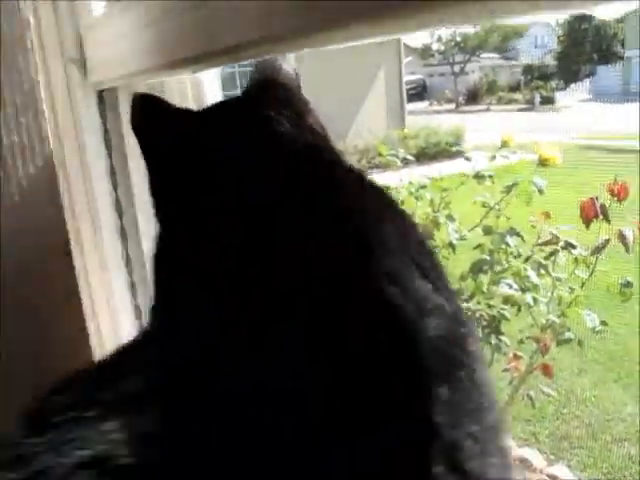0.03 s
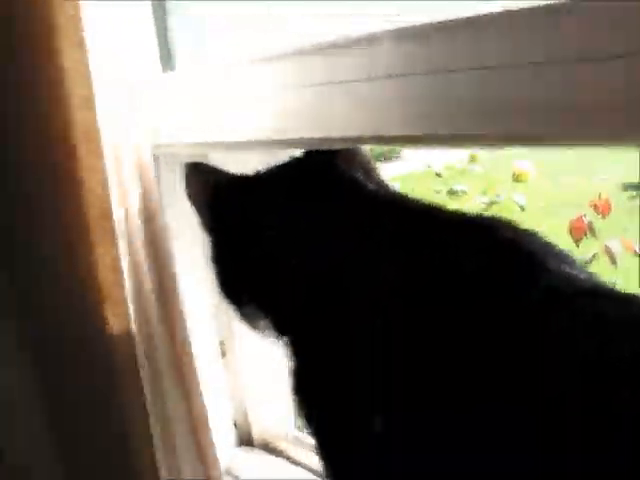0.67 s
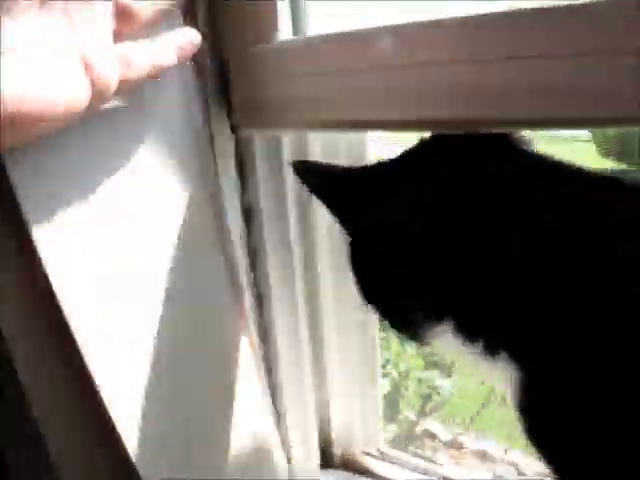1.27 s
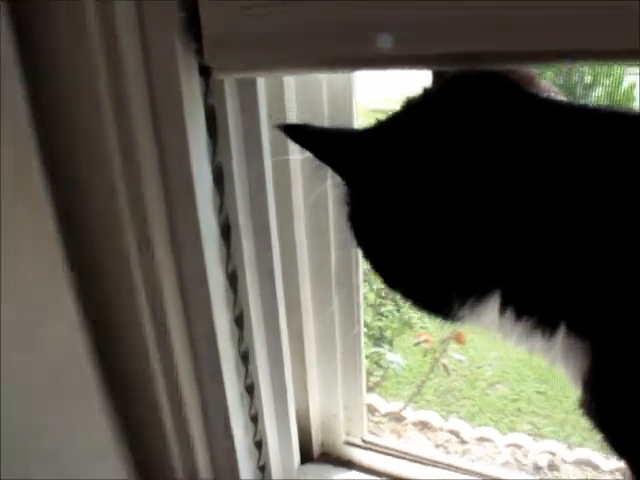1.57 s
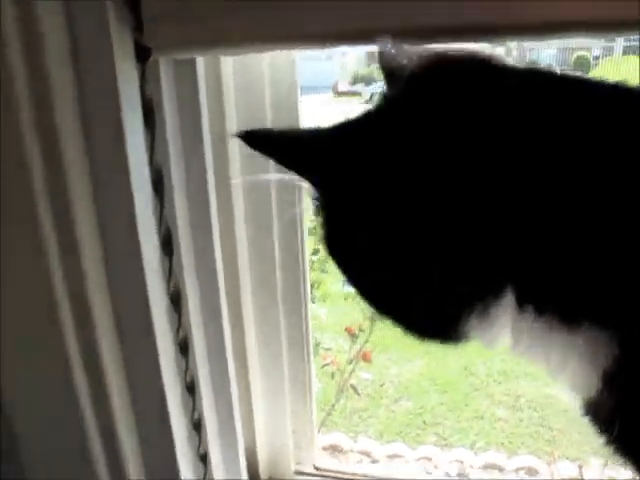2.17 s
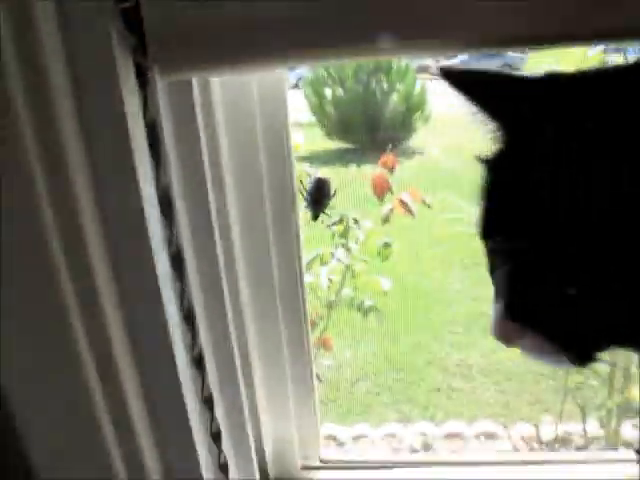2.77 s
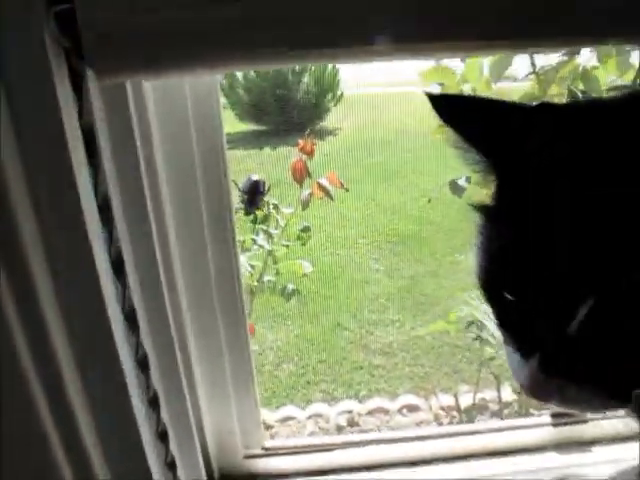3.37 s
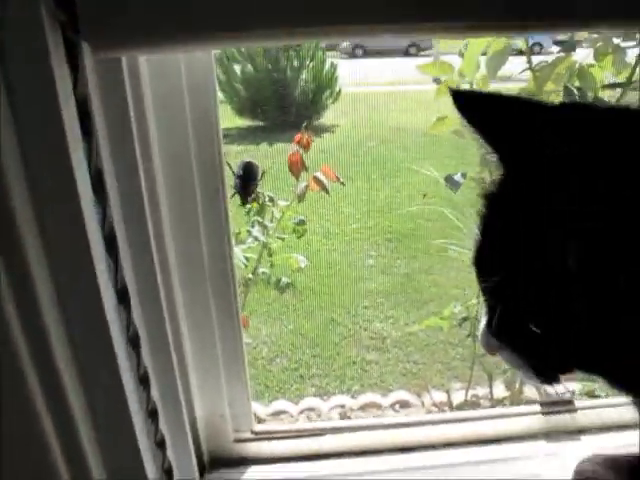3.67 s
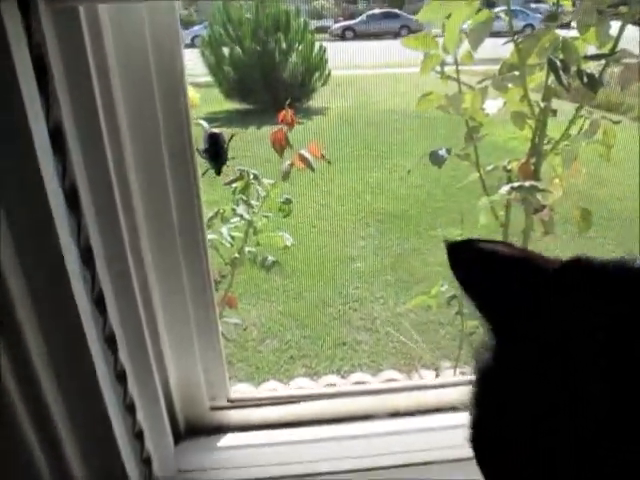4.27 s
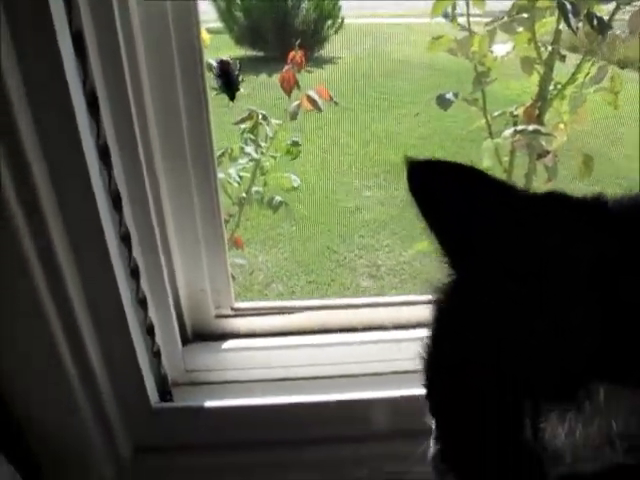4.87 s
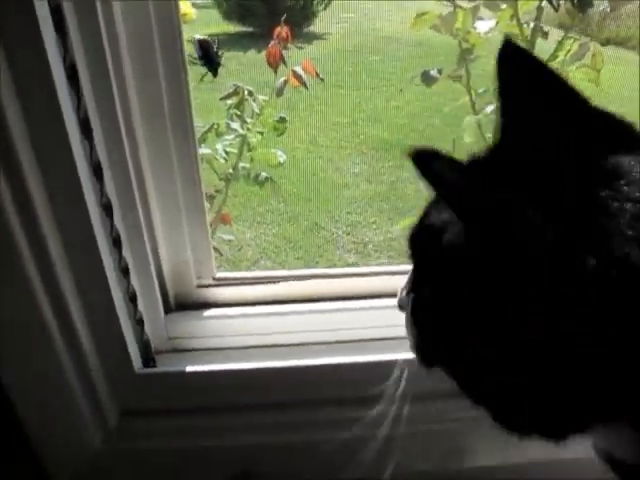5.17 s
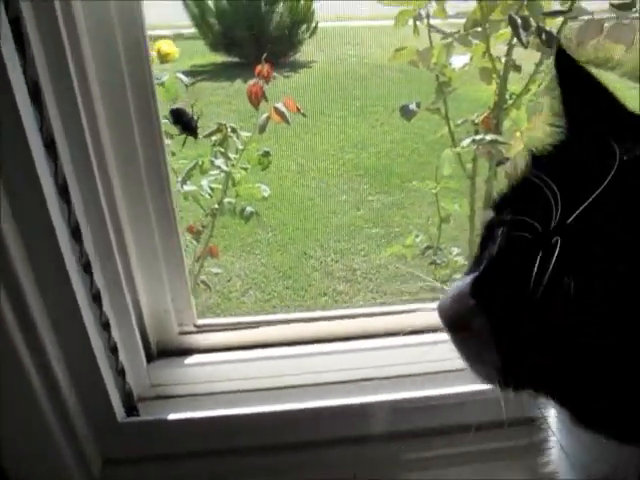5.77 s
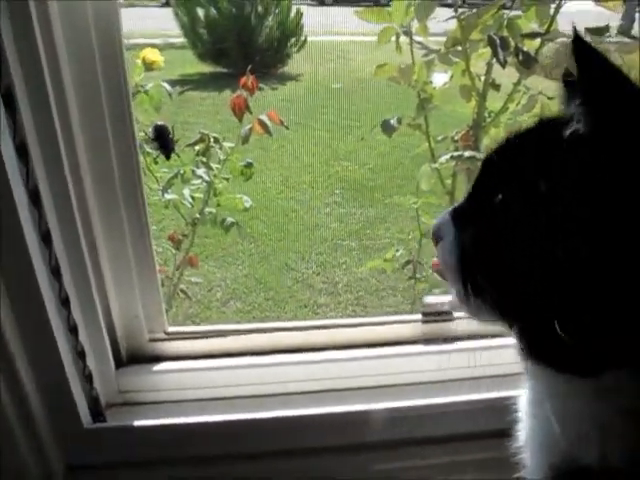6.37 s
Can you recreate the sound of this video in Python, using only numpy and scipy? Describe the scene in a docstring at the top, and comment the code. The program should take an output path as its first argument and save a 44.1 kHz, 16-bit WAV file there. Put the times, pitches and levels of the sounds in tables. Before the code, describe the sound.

Sparse sharp plastic clicks, soft scuffs and wooden knocks come from a window blind pushed aside near a cat indoors.

```python
"""A cat at the window blind

A cat noses about on an indoor window sill while a hand holding a small camera pushes the blind aside.
The blind rustles, scuffs and knocks on the wooden frame; its rail and a small metal part rattle.
Plastic clicks right at the microphone, and there is one soft thump, like a paw set down.
Under it all lie faint hiss, mains hum, a few thin tones and the camera's whine."""
import sys
import numpy as np
from scipy import signal
from scipy.fft import rfft, irfft, next_fast_len
from scipy.io import wavfile
from scipy.ndimage import map_coordinates

SR = 44100
rng = np.random.default_rng(int(sys.argv[2]) if len(sys.argv) > 2 else 0)


def dump(signal):
    """Clip the signal to [-1, 1] and save it as 16-bit WAV at the path in sys.argv[1]."""
    limited = np.clip(np.atleast_2d(signal).T, -1, 1)
    pcm = np.round(limited * 32767).astype(np.int16)
    wavfile.write(sys.argv[1], SR, pcm)


N = 283563


def amp(db):
    """Turn decibels into gain. amp(-60 * t / t60) fades by 60 dB in t60 seconds."""
    return 10 ** (np.asarray(db) / 20)


def unit(x):
    """Scale a sound to an average (rms) level of 1."""
    return x / np.sqrt(np.mean(x ** 2) + 1e-20)


def burst(x, seconds):
    """Give a hit as much energy as that many seconds of sound at level 1."""
    return x * np.sqrt(seconds * SR / (np.sum(x ** 2) + 1e-20))


def along(points, hz):
    """Read between (frequency, value) points, with octaves evenly spaced."""
    f, values = np.transpose(points)
    return np.interp(np.log(hz + 1), np.log(f + 1), values)


def wobble(rate):
    """A smooth curve through `rate` random values a second."""
    points = rng.standard_normal(int(N * rate / SR) + 4)
    return map_coordinates(points, [np.arange(N) * rate / SR])


def filtered(x, gain_at):
    """Turn each frequency up or down by gain_at(hz)."""
    size = next_fast_len(len(x) + 8192)
    return irfft(rfft(x, size) * gain_at(np.fft.rfftfreq(size, 1 / SR)), size)[:len(x)]


def noise(colour, size):
    """Noise at level 1; its colour says how strong each frequency is."""
    return unit(filtered(rng.standard_normal(size), lambda hz: amp(along(colour, hz))))


def contact(x, low_hz, high_hz):
    """A small contact makes no low notes, a soft one no high notes."""
    for hz, kind in ((low_hz, "high"), (high_hz, "low")):
        x = signal.sosfilt(signal.butter(2, min(hz, SR / 2 - 1), kind, fs=SR, output="sos"), x)
    return x


def add(track, s, x):
    """Mix x into the track at s seconds."""
    part = track[round(s * SR):][:len(x)]
    part += x[:len(part)]


def ringing(notes, share, t, scatter_db):
    """A struck part rings; whatever presses on it leaves only a share of its ringing time."""
    offsets_db = scatter_db * rng.standard_normal(len(notes))
    return sum(amp(db + offset - 60 * t / (t60 * share)) * np.sin(2 * np.pi * hz * t)
               for (hz, db, t60), offset in zip(notes, offsets_db))


def swells(pushes):
    """Each push grows and dies away; where pushes overlap, their powers add."""
    t = np.arange(N) / SR
    return np.sqrt(sum((amp(db) * np.exp(-np.maximum((s - t) / swell, (t - s) / ease))) ** 2
                       for s, db, swell, ease in pushes))


def background(hiss_db=-60.0, whine_hz=5880, settle_s=0.031, waver_db=0.3):
    """Steady hiss, mains hum and the camera's whine, which switches between levels."""
    # colour of the room and microphone hiss: f/Hz, level/dB
    hiss_colour = [(15, -3.5), (55, -1.5), (130, -0.5), (300, -6), (900, -8.5), (2500, -14), (6000, -18),
                   (8500, -20), (10300, -19), (11500, -29.5), (13000, -27), (15500, -28.5)]
    # notes of the hum: f/Hz, level/dB
    hum_notes = [(59.5, -75), (120, -90.5), (300, -77), (1077, -80.5)]
    # levels the whine holds: from t/s, level/dB
    steps = [(0, -57), (.63, -68), (1.79, -57), (3.91, -62), (5.06, -57.5), (5.15, -62.5)]
    t = np.arange(N) / SR
    hum = sum(amp(db + wobble(2.07)) * np.sin(2 * np.pi * (hz * t + rng.random()))
              for hz, db in hum_notes)
    whine_db = steps[0][1]
    for (_, old), (s, new) in zip(steps, steps[1:]):
        whine_db += (new - old) * (1 + np.tanh((t - s) / settle_s)) / 2
    whine = amp(whine_db + waver_db * wobble(12)) * np.sin(2 * np.pi * whine_hz * t)
    return amp(hiss_db) * noise(hiss_colour, N) + np.sqrt(2) * (hum + whine)


def faint_tones(waver_db=1.6, blur_hz=7, blur_rate=60):
    """A few thin, blurred tones come and go, barely above the hiss."""
    # gliding tones: start t/s, end t/s, first f/Hz, last f/Hz, level/dB
    tones = [(1.34, 1.37, 4350, 4280, -64), (2.1, 2.227, 848, 841, -64), (3.08, 3.204, 837, 828, -64.5),
             (3.144, 3.422, 719, 680, -66), (4.12, 4.456, 1663, 1680, -61.5)]
    out = np.zeros(N)
    for start, end, first_hz, last_hz, db in tones:
        size = round((end - start) * SR)
        hz = np.linspace(first_hz, last_hz, size) + blur_hz * wobble(blur_rate)[:size]
        tone = np.sqrt(2) * np.sin(2 * np.pi * np.cumsum(hz) / SR)
        add(out, start, amp(db) * signal.windows.tukey(size, .3) * tone)
    return out * amp(waver_db * wobble(40))


def blind_rustle(grain_db=3, unsteady_db=1.0, unsteady_rate=22):
    """The blind rubs in fine grains under an unsteady push, and rasps where it drags on the frame."""
    # pushes that slide the blind: fastest at t/s, level/dB, swell/s, ease off/s
    pushes = [(.01, -60.5, .03, .11), (.325, -51, 0.038, .055), (.49, -60, 0.13, 0.33),
              (1.105, -52.5, 0.078, 0.26), (1.64, -60, 0.23, 0.33), (2.07, -60, 0.1, 0.3),
              (2.54, -55.5, 0.26, 0.28), (3.07, -56, 0.19, 0.33), (3.59, -58, 0.04, 0.062)]
    # drags on the frame: hardest at t/s, level/dB, swell/s, ease off/s
    drags = [(.01, -67, .03, 0.15), (.278, -56, 0.0072, 0.058), (.355, -59, 0.032, 0.03),
             (.46, -62, 0.086, .07), (2.265, -55, .012, .025), (3.365, -53.5, .003, 0.039)]
    # colour of the fine rubbing: f/Hz, level/dB
    rub_colour = [(290, -43.5), (500, -5), (827, -3.5), (888, -4), (1180, -5), (3630, -8.5), (5510, -8.5),
                  (6000, -4), (6270, -10.5), (10400, -7), (15500, -34.5)]
    # colour of the duller rasp: f/Hz, level/dB
    rasp_colour = [(800, -30.5), (2000, -11.5), (2700, -7.5), (3600, -14), (5500, -25), (12000, -50)]
    rub = swells(pushes) * unit(noise(rub_colour, N) * amp(grain_db * wobble(700)))
    rasp = swells(drags) * unit(noise(rasp_colour, N) * amp(grain_db * wobble(300)))
    return (rub + rasp) * amp(unsteady_db * wobble(unsteady_rate))


def blind_scuffs():
    """The blind's edge catches and slides: a sudden bright scrape that fades as it lets go."""
    # slides: t/s, level/dB, length/s, fade t60/s, lowest f/Hz
    slides = [(.495, -63, 0.0074, .04, 8000), (0.512, -53.5, 0.0045, 0.063, 7000),
              (0.6218, -39, 0.018, 0.027, 2560), (0.705, -50.5, 0.0015, 0.19, 1500),
              (1.467, -58, 0.0046, 0.39, 1500), (1.692, -48, 0.004, 0.054, 5000),
              (1.819, -44.5, 0.0012, 0.013, 5000), (1.884, -46.5, 0.0021, 0.06, 10050),
              (1.997, -57.5, .012, 0.048, 8000), (2.1444, -52, 0.0017, .02, 3000),
              (2.2336, -54, .004, .03, 6000), (2.389, -54.5, 0.023, 0.029, 5000),
              (2.511, -53, 0.014, 0.055, 2480), (2.6083, -51.5, 0.01, 0.1, 4000),
              (2.751, -55.5, .004, 0.068, 4000), (3.094, -52, 0.016, 0.09, 2520),
              (3.561, -57, 0.0047, 0.028, 4000), (3.587, -55, 0.016, 0.066, 2990),
              (3.807, -59.5, .004, .1, 4070), (4.187, -52.5, 0.0052, 0.25, 4450),
              (4.381, -60, .001, 0.022, 9060)]
    # colour of the scrape: f/Hz, level/dB
    colour = [(470, -49.5), (800, -19), (1910, -6.5), (2500, -18.5), (2630, -4.5), (3370, -5.5),
              (5820, -10), (9090, -5.5), (10400, -5), (11700, -26.5), (15500, -28)]
    out, t = np.zeros(N), np.arange(SR // 4) / SR
    for s, db, length, t60, low_hz in slides:
        grit = filtered(noise(colour, len(t)), lambda hz: hz ** 2 / np.hypot(hz ** 2, low_hz ** 2))
        add(out, s, amp(db - 60 * np.maximum(t - length, 0) / t60) * unit(grit))
    return out


def rattles(blows, notes, chatter_db, chatter_t60, clack_db):
    """A loose part is struck with a hard clack, then chatters in its seat, which roughens its ring."""
    out, t = np.zeros(N), np.arange(SR // 3) / SR
    for s, db, low_hz, high_hz, share in blows:
        chatter = rng.standard_normal(len(t)) * amp(-60 * t / (share * chatter_t60))
        force = signal.unit_impulse(len(t)) + amp(chatter_db) * chatter / np.linalg.norm(chatter)
        ring = signal.fftconvolve(force, ringing(notes, share, t, scatter_db=4.5))[:len(t)]
        clack = ringing(notes, .06, t, scatter_db=1)
        hit = burst(ring, 1) + amp(clack_db) * burst(clack, 0.89)
        add(out, s, amp(db) * burst(contact(hit, low_hz, high_hz), 0.015))
    return out


def metal_clinks():
    """A small metal part is jolted and rings with high notes."""
    # jolts: t/s, level/dB, lowest f/Hz, highest f/Hz, share of ringing time
    jolts = [(1.8184, -61, 5000, 10000, 0.26), (3.809, -60.5, 4500, 8000, 0.64),
             (4.19, -44.5, 5500, 11000, 0.74)]
    # notes of the metal: f/Hz, level/dB, t60/s
    notes = [(3500, -1, 0.083), (4450, -3, 0.1), (4800, 0, 0.22), (5600, -6, 0.21), (5690, 12, 0.12),
             (6930, 1, 0.18), (7350, 2, 0.27), (7385, -12, 0.34), (7900, -2, 0.31)]
    return rattles(jolts, notes, chatter_db=6, chatter_t60=0.21, clack_db=-8)


def rail_bumps():
    """The blind's hollow bottom rail bumps and rattles."""
    # bumps: t/s, level/dB, lowest f/Hz, highest f/Hz, share of ringing time
    bumps = [(2.554, -49, 1200, 3500, 0.37), (2.6068, -41.5, 373, 5500, 0.87),
             (2.7495, -51.5, 890, 5000, 0.39), (3.097, -55, 597, 3000, 0.35), (4.189, -50, 500, 1990, .7)]
    # notes of the rail: f/Hz, level/dB, t60/s
    notes = [(479, 9, 0.1), (722, -1.5, 0.12), (1137, -9, 0.08), (1360, 1.5, 0.059), (1834, -5, 0.075),
             (2060, -4.5, 0.14), (3540, 3, 0.042), (3820, -5.5, 0.086), (4500, -13, 0.12)]
    return rattles(bumps, notes, chatter_db=3, chatter_t60=0.19, clack_db=-4.0)


def soft_thump(s=4.1888, db=-42, pitch_hz=198, t60=0.086, attack_s=0.0008):
    """One low note that dies quickly, like a paw set down on the sill."""
    out, t = np.zeros(N), np.arange(SR // 4) / SR
    loudness = amp(-60 * t / t60) * (1 - np.exp(-t / attack_s))
    add(out, s, amp(db) * burst(loudness * np.sin(2 * np.pi * pitch_hz * t), 0.015))
    return out


def frame_knocks(ring_db=-1, thud_db=-5, tap_hz=1600, tap_t60=0.0064, attack_s=0.00023):
    """A blow on the wooden window frame gives a brief tap, then a ring and a thud die away."""
    # blows: t/s, level/dB, lowest f/Hz, highest f/Hz, share of ringing time, tap level/dB
    blows = [(.51, -57.5, 305, 2200, 0.51, 0), (.532, -58, 400, 1000, 0.7, -18),
             (0.6617, -44.5, 229, 606, 0.63, -17), (1.1727, -25.5, 140, 1730, 0.75, -4),
             (1.27, -53, 700, 1410, 0.51, -9), (1.312, -55, 600, 1850, 0.87, -15),
             (1.4654, -43, 219, 1300, 0.82, -18), (2.111, -55, 870, 1814, 0.6, -2.5),
             (2.198, -58.5, 960, 1400, 0.17, -12), (2.295, -55.5, 630, 1400, 0.28, -18),
             (2.607, -47.5, 190, 650, 0.26, -18), (2.75, -51, 640, 1290, 0.44, -22),
             (3.216, -54, 990, 1502, 0.54, -17), (4.807, -65, 200, 700, .3, -7),
             (5.209, -63, 350, 1500, 0.22, -20)]
    # notes of the frame: f/Hz, level/dB, t60/s
    notes = [(221, -6, 0.38), (297, -1, 0.34), (338, -4, 0.17), (384, 0, 0.31), (501, -8, 0.2),
             (770, -15, 0.27), (834, -15, 0.26), (1093, -19, 0.22), (1163, -13, 0.14), (1459, -24, 0.29),
             (1561, -20, 0.21), (1701, -32, 0.67), (1933, -25, 0.3), (2444, -24, 0.091)]
    # colour of the wood's dense, brief shaking: f/Hz, level/dB
    thud_colour = [(50, -31), (130, -14.5), (210, -7), (320, -2.5), (430, -3.5), (540, -10), (900, -18.5),
                   (1250, -12), (1700, -19), (2300, -20), (3500, -29.5), (8000, -43)]
    # how long that shaking lasts: f/Hz, t60/s
    thud_t60 = [(150, 0.86), (400, 0.25), (1000, 0.27), (2000, 0.14), (6000, 0.14)]
    out, t = np.zeros(N), np.arange(SR // 2) / SR
    tap = burst(np.sin(2 * np.pi * tap_hz * t) * amp(-60 * t / tap_t60), 0.56)
    rise = 1 - np.exp(-t / attack_s)
    for s, db, low_hz, high_hz, share, tap_db in blows:
        ring = ringing(notes, share, t, scatter_db=-0.5)
        # split noise into bands, so that the low ones can last longer
        hz, age, bands = signal.stft(noise(thud_colour, len(t)), SR, nperseg=256)
        fade = amp(-60 * age / (share * along(thud_t60, hz)[:, None]))
        thud = signal.istft(bands * fade, SR, nperseg=256)[1][:len(t)]
        knock = amp(ring_db) * burst(ring, 0.89) + amp(thud_db) * burst(thud, 1) + amp(tap_db) * tap
        add(out, s, amp(db) * burst(contact(knock * rise, low_hz, high_hz), 0.029))
    return out


def plastic_clicks(rise_cycles=0.81, crack_db=-20, crack_t60=0.015, tail_db=-42, tail_t60=0.08,
                   boost_octaves=0.12):
    """Plastic rings for an instant, with a crack and a faint tail; the spot touched colours it."""
    # clicks: t/s, level/dB, lowest f/Hz, highest f/Hz, f/Hz the spot boosts or cuts, boost/dB
    clicks = [(0.62, -37, 680, 9000, 1480, 9.5), (.6984, -10, 3070, 12200, 3270, 5),
              (0.7173, -40, 1500, 3500, 1950, 4), (.969, -56, 2500, 4000, 3160, 7),
              (1.4324, -47, 200, 1300, 1030, 4.5), (1.4675, -45.5, 2500, 5000, 3600, 9),
              (1.7189, -41.5, 1790, 4560, 2130, 6.5), (2.0693, -47.5, 1800, 3480, 2600, -2),
              (2.0908, -45, 2200, 10000, 4000, 6), (2.111, -40, 1300, 14000, 8020, 15),
              (2.162, -47, 1800, 6000, 3400, -3), (2.4137, -23, 1640, 3850, 3060, 5),
              (2.717, -51, 1830, 3500, 3000, -1), (2.9046, -33, 1100, 7000, 3530, 9),
              (3.182, -46.5, 1390, 2600, 1820, 6), (3.2376, -46, 2500, 7000, 4460, 3),
              (3.36, -42.5, 3300, 4200, 3600, 15), (3.8792, -47.5, 1500, 3000, 1520, 8),
              (3.9554, -37.5, 1690, 3180, 2800, 4), (4.934, -55, 1492, 3460, 2000, 9),
              (5.2091, -35, 2280, 7400, 3300, -7.5), (5.803, -49.5, 1500, 4500, 1970, 6)]
    # notes of the plastic: f/Hz, level/dB, t60/s
    notes = [(397, -1.5, .02), (978, -9, 0.02), (1530, -9.5, 0.011), (2010, -1, 0.0098),
             (2690, -5.5, 0.013), (3167, 2, 0.0075), (3497, -4, 0.01094), (4310, -11.5, 0.016),
             (4510, -4.5, 0.01), (5370, -2.5, 0.0075), (6160, -2.5, 0.0094), (7590, -4.5, 0.00569),
             (8530, -6.5, 0.0065), (9500, -1.5, 0.004), (11000, -13.5, 0.0073), (12400, -9, 0.0028),
             (13580, -13.5, .003), (14410, -7.5, .003)]
    out, t = np.zeros(N), np.arange(SR // 10) / SR
    hz, level, t60 = np.transpose(notes)[:, :, None]
    rise = 1 - np.exp(-t * hz / rise_cycles)  # high notes build up first
    rings = np.sin(2 * np.pi * hz * t) * amp(level - 60 * t / t60) * rise
    crack_fade = amp(crack_db - 60 * t / crack_t60) + amp(tail_db - 60 * t / tail_t60)
    for s, db, low_hz, high_hz, spot_hz, spot_db in clicks:
        boost_db = spot_db * np.exp(-(np.log2(hz / spot_hz) / boost_octaves) ** 2)
        ring = np.sum(amp(boost_db + rng.normal(0, 0.93, hz.shape)) * rings, axis=0)
        crack = crack_fade * rng.standard_normal(len(t))
        add(out, s, amp(db) * burst(contact(ring + crack, low_hz, high_hz), 0.0028))
    return out


def scene():
    """All the sounds meet at one microphone."""
    hits = rail_bumps() + metal_clinks() + plastic_clicks() + frame_knocks() + soft_thump()
    return (hits + blind_scuffs() + blind_rustle() + background() + faint_tones())[None]


def record(dry, notch_hz=11780, notch_q=9, top_hz=15900):
    """The camera loses a narrow band of treble, rounds off loud peaks and cuts the highest sounds."""
    notched = signal.lfilter(*signal.iirnotch(notch_hz, notch_q, SR), dry[0])
    rounded = notched / (1 + notched ** 8) ** (1 / 8)
    return filtered(rounded, lambda hz: 1 / (1 + (hz / top_hz) ** 120))[None]


dry = scene()
out = record(dry)
dump(out)
```